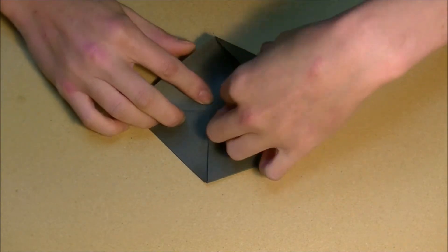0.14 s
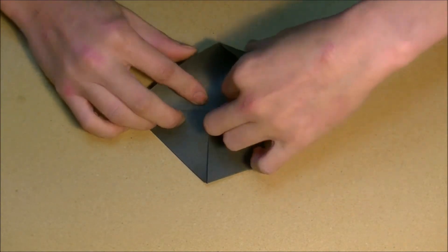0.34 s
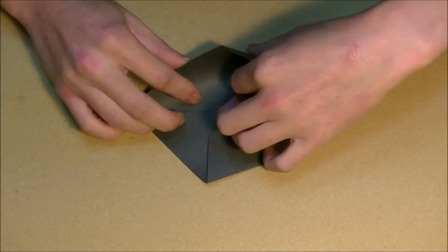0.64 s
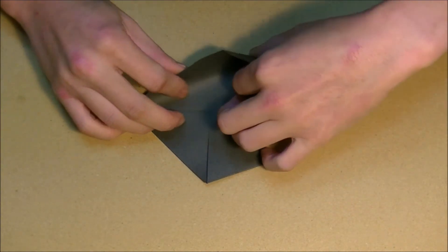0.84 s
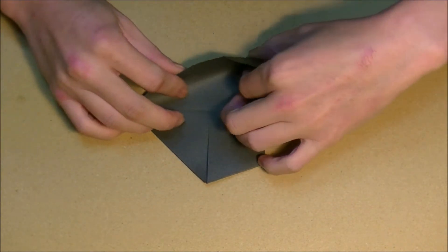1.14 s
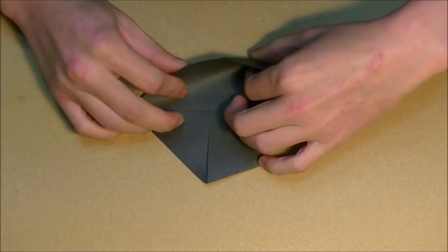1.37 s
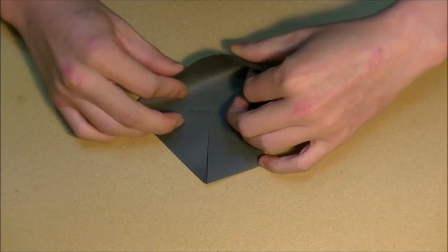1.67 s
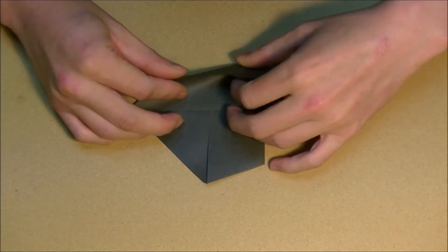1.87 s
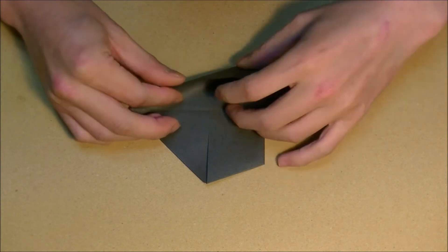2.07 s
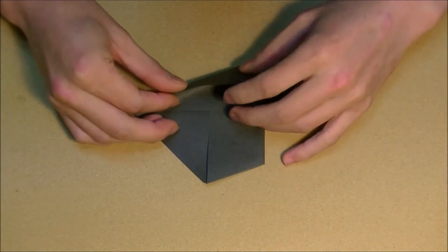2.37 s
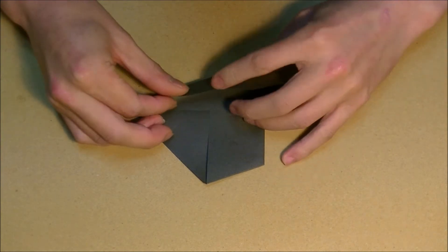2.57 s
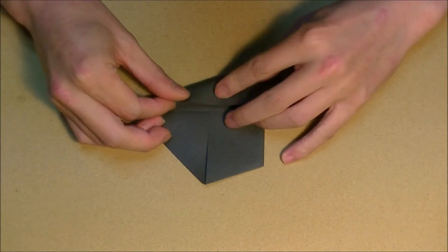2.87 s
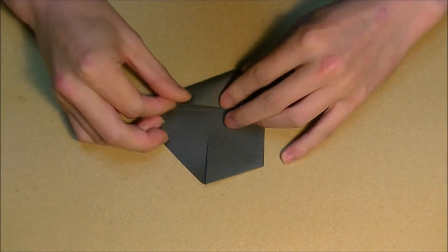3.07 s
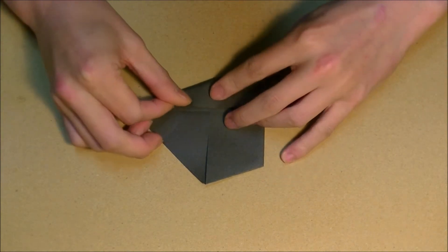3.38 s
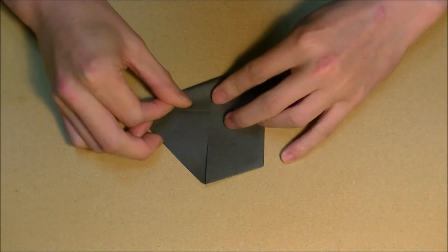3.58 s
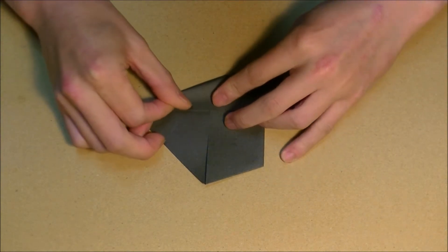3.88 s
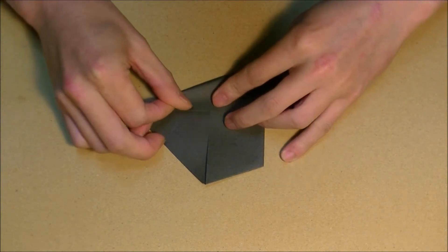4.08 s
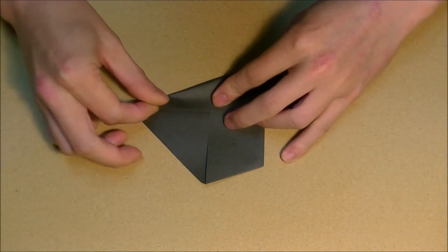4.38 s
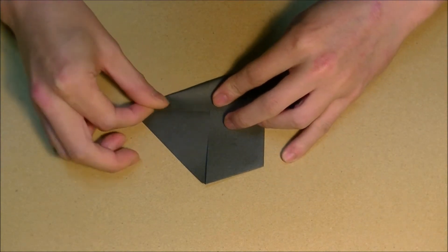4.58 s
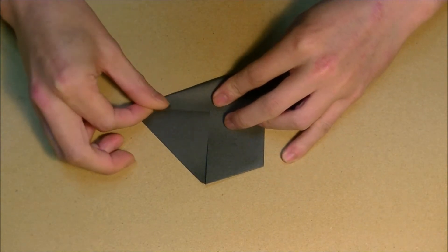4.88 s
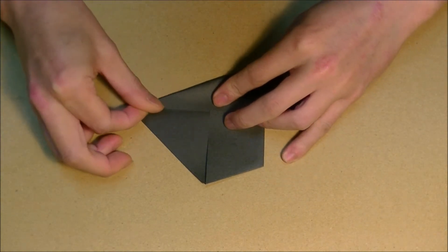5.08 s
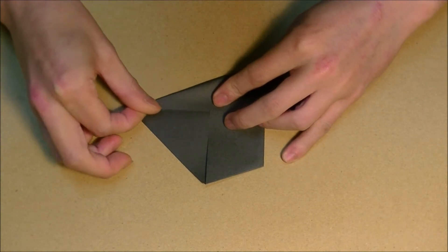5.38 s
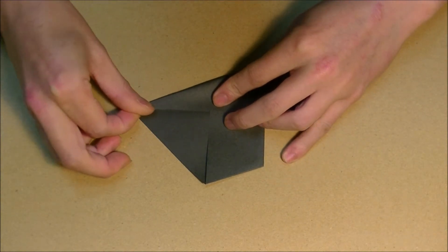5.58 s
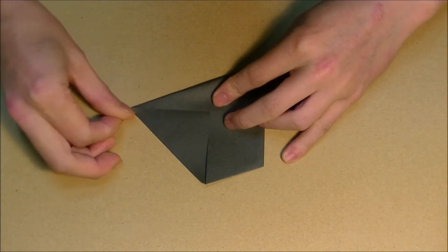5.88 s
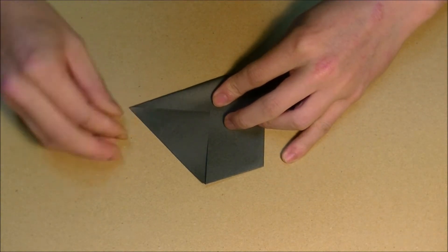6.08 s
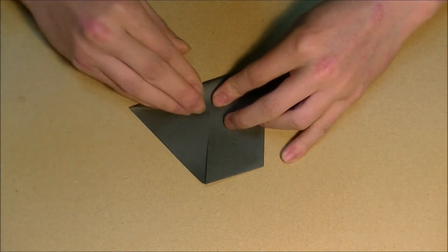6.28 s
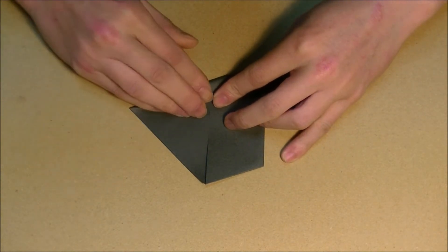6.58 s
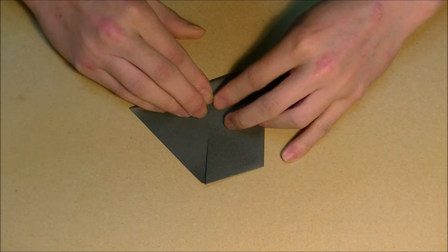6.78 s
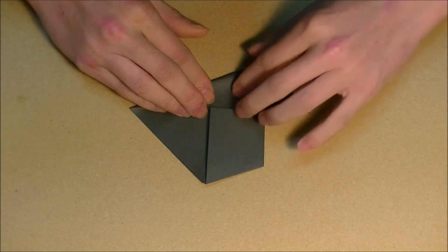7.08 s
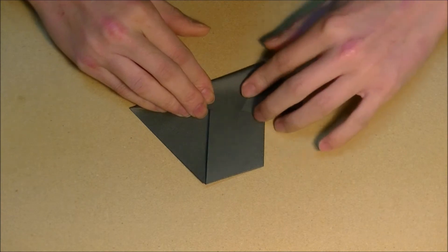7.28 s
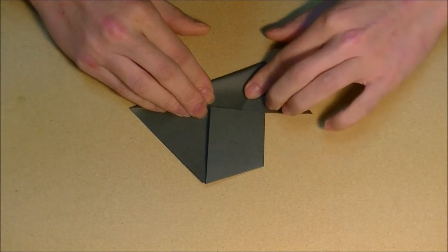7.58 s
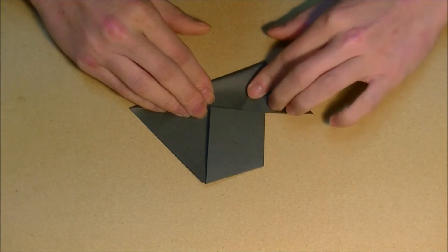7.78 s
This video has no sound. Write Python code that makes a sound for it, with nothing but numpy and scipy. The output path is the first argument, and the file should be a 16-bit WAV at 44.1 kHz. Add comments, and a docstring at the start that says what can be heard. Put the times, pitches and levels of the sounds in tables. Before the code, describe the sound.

Close, dry paper handling, with rustling rubs, quick flap flicks and sudden bright clicks as creased panels pop, over faint steady room noise.

```python
"""Folding stiff paper on a table

Two hands fold a small sheet of stiff paper in a quiet, small room.
Bent panels buckle with sharp snaps: lead-in noise, a one-sample jump and noise flutter, filtered as paper.
Flaps flick in fading noise bursts, finger pads land dully, and fingertips rub as dense ticks and crinkles
under a speed curve. Short chatter and a sinking pocket tone join the rubs.
A close stereo microphone hears this with bounces, a short room tail and steady coloured noise."""
import sys
import numpy as np
from scipy import signal
from scipy.fft import rfft, irfft, next_fast_len
from scipy.io import wavfile
from scipy.ndimage import uniform_filter1d

SR = 44100
rng = np.random.default_rng(int(sys.argv[2]) if len(sys.argv) > 2 else 0)


def wrap_up_sound(samples):
    """Save the sound to the file named by the first command line argument, as 16-bit audio."""
    columns = np.atleast_2d(samples).T
    # keep every value between -1 and 1, then stretch to whole-number steps
    tamed = np.clip(columns, -1, 1)
    steps = np.round(tamed * 32767).astype(np.int16)
    wavfile.write(sys.argv[1], SR, steps)


N = 350154
TIME = np.arange(N) / SR


def undb(db):
    """Decibels to gain."""
    return 10 ** (np.asarray(db) / 20)


def unit(x):
    """Scale to unit energy."""
    return x / np.sqrt(np.sum(x ** 2))


def steady(x):
    """Scale to standard deviation 1."""
    return x / np.std(x)


def curve(points, hz):
    """Read (Hz, dB) points on a logarithmic frequency axis."""
    point_hz, db = np.transpose(points)
    return np.interp(np.log(np.maximum(hz, 1)), np.log(point_hz), db)


def bins(size):
    """Frequencies in Hz of a real spectrum."""
    return np.arange(size // 2 + 1) * SR / size


def colour(x, points):
    """Zero-phase filter by a (Hz, dB) curve."""
    size = next_fast_len(len(x), real=True)
    gain = undb(curve(points, bins(size)))
    return irfft(rfft(x, size) * gain, size)[:len(x)]


def causal(gain):
    """Minimum-phase spectrum: the most sudden response that has this gain."""
    cepstrum = irfft(np.log(gain + 1e-9))
    half = len(cepstrum) // 2
    cepstrum[1:half] *= 2
    cepstrum[half + 1:] = 0
    return np.exp(rfft(cepstrum))


def even(x, span_hz):
    """Level out a noise burst's chance spectral peaks that are wider than span_hz."""
    spectrum = rfft(x)
    power = uniform_filter1d(abs(spectrum) ** 2, max(int(span_hz * len(x) / SR), 3))
    return irfft(spectrum * causal(np.sqrt(power.mean() / power)))


def walk(rate_hz):
    """Smoothed random curve with spread 1, about rate_hz new levels a second."""
    levels = rng.standard_normal(4096)
    line = np.interp(TIME * rate_hz, np.arange(len(levels)), levels)
    return steady(uniform_filter1d(line, int(SR / rate_hz / 2)))


def narrow(hz, width_hz):
    """A resonance at hz, kept ringing by irregular friction: two random curves on a quadrature carrier."""
    phase = 2 * np.pi * np.cumsum(hz * np.ones(N)) / SR
    return walk(width_hz) * np.cos(phase) + walk(width_hz) * np.sin(phase)


def add(track, start_s, sound):
    """Mix a sound in at start_s."""
    i = int(start_s * SR)
    track[i:i + len(sound)] += sound[:N - i]


def band_db(gain, hz, low_hz, high_hz):
    """Energy of a spectrum inside a band."""
    return 10 * np.log10(np.mean(gain ** 2 * ((hz > low_hz) & (hz < high_hz))))


def sheet(push, start_s, panel_hz, edge_db, panel_db, body_offset_db, panel_width=.1):
    """Paper's answer to a push: colour of the fold stage, one panel resonance, set body and edge levels."""
    # Colours of the loose sheet, the raised flap and the tight last fold. Each row: frequency in Hz, gain in dB.
    loose = [(100, -22), (170, -30), (290, -27), (400, -6), (490, -9), (620, -0.5), (740, 5), (880, -6),
             (1020, -1.5), (1400, -5), (1660, 2.5), (2150, -4), (2460, -1), (3200, -3.5), (3500, 4),
             (3950, -4), (5200, -4.5), (7000, -12), (10500, -14), (12500, -22), (15000, -29)]
    raised = [(60, -52), (150, -41), (450, -25.5), (670, 3), (950, -7), (1260, -3.5), (1500, -7.5),
              (1900, -6.5), (2250, -1.5), (2700, -4), (3300, 0), (3900, -4), (4300, -8), (5100, -12),
              (6200, -23.5), (8500, -17.5), (10500, -18), (15500, -40)]
    tight = [(60, -40), (130, -20), (330, -16), (900, -22), (1100, -15), (1300, -5.5), (1500, -11.5),
             (1750, -2), (1940, 3.5), (2250, -7), (2900, -4), (3400, -0.5), (4300, 0.5), (4900, -1),
             (5700, -19.5), (7800, -13), (11000, -17), (15500, -30)]
    raised_from_s, tight_from_s = 1.0, 6.7

    # the loose sheet moves more air than the raised flap, the tight fold less
    if start_s < raised_from_s:
        shape, stage_db = loose, 3
    elif start_s < tight_from_s:
        shape, stage_db = raised, 0
    else:
        shape, stage_db = tight, -2.5

    # smaller panels ring higher and sound brighter: 2 dB/octave of tilt per octave above a typical panel
    typical_panel_hz, tilt_db_per_octave = 2790, 2
    hz, spectrum = bins(len(push)), rfft(push)
    octaves = np.log2(np.clip(hz, 1000, 6000) / 1000)
    tilt_db = tilt_db_per_octave * np.log2(panel_hz / typical_panel_hz) * octaves
    resonance_db = panel_db / (1 + ((hz / panel_hz - 1) / panel_width) ** 2)
    gain = undb(curve(shape, hz) + tilt_db + resonance_db)

    # smaller panels move less of the flap: body falls 8.5 dB per octave of panel pitch
    body_db = -3 + stage_db + body_offset_db - 8.5 * np.log2(panel_hz / 1000)

    # body (whole flap) and edge (crease) are set against the middle band
    pushed = gain * abs(spectrum)
    body = band_db(pushed, hz, 400, 1000)
    middle = band_db(pushed, hz, 1000, 6000)
    edge = band_db(pushed, hz, 6000, 15000)
    balance = [(200, -middle), (580, body_db - body), (850, body_db - body),
               (1120, -middle), (5000, -middle), (6500, edge_db - edge)]
    return irfft(spectrum * causal(gain * undb(curve(balance, hz))))


def snaps(flutter_db=-6.0, flutter_per_db=-0.3, flutter_s=0.0021, flutter_rise_s=0.00046,
          lead_in_db=-21, lead_in_s=0.001, lead_s=.005, size=2048):
    """Faint noise swells for about 1 ms, the panel jumps in one step, bending waves flutter, more if weak."""
    # Bent panels snapping through.
    # Each row: jump time in seconds, level in dB, panel resonance in Hz, edge level in dB re middle band.
    snap_rows = [(1.193, -29.5, 2630, -16), (2.8529, 0, 2280, -17), (2.856, -15.5, 1300, -28),
                 (3.5753, -9, 3250, -16.5), (3.68, -26.5, 3210, -10), (4.1897, -27, 3250, -3.5),
                 (4.2352, -16, 3080, -9), (4.977, -40, 3400, -4), (5.344, -39, 2400, -5),
                 (5.532, -40.5, 3000, 0), (5.8712, -35.5, 1980, -2), (6.8229, -20.5, 2630, -11),
                 (6.9908, -10, 2600, -11.5), (7.4928, 2.5, 3700, -12), (7.8555, -37, 1340, -10)]
    out, jump = np.zeros(N), int(lead_s * SR)
    t = (np.arange(size) - jump) / SR
    after = np.maximum(t, 0)
    lead_in_shape = (t < 0) * np.exp(-abs(t) / lead_in_s)
    flutter_shape = np.exp(-after / flutter_s) * (1 - np.exp(-after / flutter_rise_s))
    for jump_s, db, panel_hz, edge_db in snap_rows:
        noise = rng.standard_normal(size)
        push = undb(lead_in_db) * unit(noise * lead_in_shape)
        push += undb(flutter_db + flutter_per_db * db) * unit(noise * flutter_shape)
        push[jump] += 1
        snap = sheet(push, jump_s, panel_hz, edge_db, panel_db=4, body_offset_db=-5)
        add(out, jump_s - lead_s, undb(db) * snap)
    return out


def flicks(contact_s=0.0047, contact_s_per_db=-.00005, rise_s=0.00045, scatter_db=3, size=4096):
    """An edge slips off in a quick, fading burst of unequal contacts; a gentle flick takes longer to settle."""
    # Flaps and fingertips flicking over edges.
    # Each row: start in seconds, level in dB, panel resonance in Hz, edge level in dB re middle band.
    flick_rows = [(0.0853, -23.5, 1530, -10), (0.1545, 2.5, 2450, -8), (0.3455, -24.5, 3400, -3),
                  (0.3505, -17, 1400, -9.5), (0.4345, -12.5, 1760, -6), (0.3825, -26, 4400, -9),
                  (0.461, -19.5, 3830, -6), (0.6241, -31, 2200, -8), (1.533, -32, 1900, -14),
                  (2.185, -25, 2900, -13), (2.289, -27.5, 2890, -10), (2.3105, -21.5, 3250, -9.5),
                  (2.3681, -25.5, 2890, -12), (2.3738, -26.5, 2890, -12), (2.4511, -27.5, 2000, -24),
                  (2.4817, -23, 2100, -13), (2.5154, -28, 1890, -15), (2.5504, -31.5, 2400, -17),
                  (2.8675, -16.5, 1300, -28), (3.181, -15.5, 690, -25), (3.438, -35, 2300, -24),
                  (3.4968, -19, 2400, -17), (3.504, -23.5, 2900, -15), (3.5948, -20, 1260, -29),
                  (3.612, -29, 1400, -28), (4.143, -38.5, 3800, 1.5), (4.1522, -27.5, 2000, -20),
                  (5.889, -36.5, 2600, 1), (6.2805, -27.5, 3230, -7.5), (6.293, -34, 1900, -5),
                  (6.955, -32.5, 3500, -6), (7.1336, -27, 2700, -19), (7.2029, -21.5, 3680, -2.5),
                  (7.2113, -17.5, 3340, -11), (7.6492, -28, 4290, 2), (7.6738, -29.5, 3570, -0.5)]
    out, t = np.zeros(N), np.arange(size) / SR
    for start_s, db, panel_hz, edge_db in flick_rows:
        contacts = rng.standard_normal(size) * undb(scatter_db * rng.standard_normal(size))
        settle_s = max(contact_s + contact_s_per_db * db, rise_s)
        envelope = np.exp(-(t / settle_s) ** 1.35) * (1 - np.exp(-t / rise_s))
        push = even(contacts * envelope, span_hz=600)
        flick = sheet(push, start_s, panel_hz, edge_db, panel_db=4, body_offset_db=-1)
        add(out, start_s, undb(db) * flick)
    return out


def pads(contact_s=.003, order=6, size=2048):
    """A soft finger pad lands on the paper with a dull, low-passed pat."""
    # Landings. Each row: start in seconds, level in dB, frequency in Hz above which the pat is muffled.
    pad_rows = [(3.0806, -23, 2700), (5.7262, -32.5, 1750), (5.896, -34, 1600)]
    # The flat sheet under a pad. Each row: frequency in Hz, gain in dB.
    flat_sheet = [(100, -32), (320, -7), (1300, -1.5), (1630, 5), (1900, -1.5)]
    out, t, hz = np.zeros(N), np.arange(size) / SR, bins(size)
    for start_s, db, muffle_hz in pad_rows:
        push = even(rng.standard_normal(size) * np.exp(-t / contact_s), span_hz=400)
        gain = undb(curve(flat_sheet, hz)) / np.hypot(1, (hz / muffle_hz) ** order)
        add(out, start_s, undb(db) * unit(irfft(rfft(push) * causal(gain))))
    return out


def stroke(t, start_s, length_s, rise_share, sharpness=0.84):
    """Speed of a finger that gathers pace and comes to rest again."""
    fastest_s = start_s + length_s * np.clip(rise_share, .05, .95)
    ramp = np.interp(t, [start_s, fastest_s, start_s + length_s], [0, 1, 0])
    return np.sin(np.pi / 2 * ramp) ** sharpness


def crinkles(low_hz=1000, high_hz=4900, ring_s=.0009, spread_db=2.2, count=6000, size=512):
    """Tiny wrinkles give way under the finger, each a short decaying sine with a pitch of its own."""
    out, t = np.zeros(N), np.arange(size) / SR
    for when, pitch, chance in rng.random((count, 3)):
        strength = undb(spread_db * min(-np.log(chance), 3))
        hz = low_hz + (high_hz - low_hz) * pitch
        add(out, when * TIME[-1], strength * np.exp(-t / ring_s) * np.sin(2 * np.pi * hz * t))
    return steady(out)


def fibres(catches_per_s=12000, spread_db=1.5, crinkle_db=-7):
    """Dense catches of skin on paper fibres, as random impulses, mixed with crinkles."""
    size = rng.choice([-1, 1], N) * undb(spread_db * np.minimum(rng.exponential(size=N), 4))
    catches = (rng.random(N) < catches_per_s / SR) * size
    return steady(steady(catches) + undb(crinkle_db) * crinkles())


def rubbed(drive, shape):
    """Fibre catches ring the held sheet: its body and the hiss above it, each at rms 1."""
    # Bending resonances where the sheet is held down. Each row: frequency in Hz, width in Hz, peak in dB.
    sheet_modes = [(1320, 90, 5.5), (1630, 150, 5), (2230, 110, 3), (2560, 120, 4), (2880, 100, 4),
                   (3230, 110, 4), (3870, 87, 1)]
    grid_hz = np.geomspace(50, SR / 2, 1024)
    ringing_db = sum(db / (1 + (2 * (grid_hz - hz) / width_hz) ** 2) for hz, width_hz, db in sheet_modes)
    sound = colour(drive, np.column_stack([grid_hz, curve(shape, grid_hz) + ringing_db]))
    body = colour(sound, [(5100, 0), (7000, -30)])
    return steady(body), steady(sound - body)


def panel(x, panel_hz, boost_db=4, width=.09):
    """The panel under the finger rings at its own pitch; rms 1."""
    hz = bins(1024)[1:]
    resonance_db = boost_db / (1 + ((hz / panel_hz - 1) / width) ** 2)
    return steady(colour(x, np.column_stack([hz, resonance_db])))


def rubs(level_db=-.6, hiss_offset_db=-0.17, judder_db=1.6, judder_hz=70,
         shift_db=2.5, shift_hz=14, shift_treble_db=-6, shift_hiss_db=-14):
    """Sliding fingertips judder and ring the slack, later taut sheet; resting fingers shift softly."""
    # Fingertip strokes. Each row: start in seconds, length in seconds, share of it spent gathering speed (0-1),
    # level in dB before level_db, hiss in dB re body before hiss_offset_db, panel resonance in Hz.
    rub_rows = [(0.025, 0.065, 0.54, -62.5, 2, 1580), (0.08, 0.072, 0.34, -53, -6.5, 1580),
                (0.161, 0.059, 0.2, -41.5, -15, 3500), (0.295, .06, .8, -63, 1, 3400),
                (0.35, 0.043, .6, -49, -8, 4400), (0.435, 0.061, 0.3, -46, -13, 3860),
                (0.635, .125, 0.4, -54, -5.5, 3250), (0.74, 0.12, .4, -60, -1.5, 3430),
                (0.999, 0.054, 0.2, -56, -8.5, 2650), (1.07, 0.12, 0.26, -63, -10, 1670),
                (1.191, 0.12, .5, -64.5, -13, 2170), (1.299, 0.077, .5, -59.5, -12, 1710),
                (1.447, .06, 0.23, -54, -8.5, 1910), (1.535, 0.061, 0.48, -54.5, -2, 3150),
                (1.58, 0.078, .5, -52, -4.5, 3150), (1.655, .11, 0.31, -47.5, -7.5, 3370),
                (1.8, 0.073, 0.34, -54.5, -11.5, 3270), (1.93, .11, .7, -54.5, -10.5, 1620),
                (2.031, .07, .5, -61.5, -13, 1300), (2.1, .1, .55, -52.5, -13, 1620),
                (2.165, 0.076, 0.4, -48, -11.5, 1590), (2.265, 0.063, 0.52, -50, -11, 2640),
                (2.585, .1, 0.48, -54.5, -11, 1630), (2.669, .05, .45, -59, -2.5, 2600),
                (2.9, 0.083, 0.3, -44, -12.5, 3150), (2.95, 0.088, .35, -49.5, -11, 3050),
                (3.099, 0.08, .25, -51, -3.5, 3250), (3.17, 0.052, 0.36, -60.5, -1.5, 3270),
                (4.225, 0.12, 0.47, -53.5, -4, 3110), (4.275, 0.094, 0.45, -54.5, -2.5, 4020),
                (4.465, .06, .1, -64.5, 2, 3890), (4.985, .085, .65, -64, -7, 3180),
                (5.339, .11, .5, -68, -8, 3300), (5.729, 0.16, 0.67, -65.5, -5, 1620),
                (6.38, 0.063, .45, -64.5, -0.5, 2650), (6.486, .06, 0.67, -62, -2, 3220),
                (6.773, 0.042, .3, -59, 0.5, 3310), (6.809, .17, 0.37, -56.5, -6.5, 3230),
                (6.992, .03, .3, -53, 0, 3700), (7.02, .07, 0.45, -56.5, -5.5, 3260),
                (7.156, 0.12, 0.48, -55, -8.5, 3500), (7.28, 0.14, .45, -56, -10, 3280)]
    # Rubbing colours on slack paper and on a taut fold. Each row: frequency in Hz, gain in dB.
    slack_colour = [(80, -48), (250, -19), (700, -9), (1100, -8), (1500, -4), (1950, -2), (2500, -4),
                    (3600, -4), (4600, -8), (5800, -14), (7500, -14.5), (9800, -10), (12500, -20.5),
                    (15500, -30)]
    taut_colour = [(80, -48), (250, -22), (900, -6.5), (1500, -8.5), (2200, -5.5), (3300, -3), (4700, -3),
                   (5500, -4), (6600, -13), (9500, -7.5), (12500, -16), (15500, -27)]
    # Resting fingers shifting on the slack sheet. Each row: time in seconds, level in dB.
    shift_rows = [(0, -62), (.28, -68.5), (.53, -61.5), (.9, -76), (1.15, -66), (1.4, -72), (2.6, -66.5),
                  (2.8, -74)]
    taut_from_s = 2.85

    out, drive = np.zeros(N), fibres() * undb(judder_db * walk(judder_hz))
    slack, taut = rubbed(drive, slack_colour), rubbed(drive, taut_colour)
    for start_s, length_s, rise_share, db, hiss_db, panel_hz in rub_rows:
        span = slice(max(int(start_s * SR), 0), int((start_s + length_s) * SR))
        speed = stroke(TIME[span], start_s, length_s, rise_share)
        # every stroke meets its own random patch of fibres
        first = rng.integers(N - SR)
        patch = slice(first, first + len(speed))
        body, hiss = slack if start_s < taut_from_s else taut
        friction = panel(body[patch], panel_hz) + undb(hiss_db + hiss_offset_db) * hiss[patch]
        out[span] += undb(db + level_db) * speed * friction

    shift_s, db = np.transpose(shift_rows)
    shifting = np.interp(TIME, shift_s, undb(db), right=0) * undb(shift_db * walk(shift_hz))
    slack_body, slack_hiss = slack
    soft = colour(slack_body, [(1800, 0), (4500, shift_treble_db)])
    return out + shifting * (soft + undb(shift_hiss_db) * slack_hiss)


def chatters(width_hz=720, rise_share=0.54):
    """Short runs of stick and slip on the taut fold, each ringing one narrow resonance."""
    # Each row: start in seconds, length in seconds, level in dB, pitch in Hz.
    chatter_rows = [(2.911, 0.028, -43.5, 3130), (2.963, .02, -47.5, 3060), (2.988, .024, -48.5, 3040)]
    out = np.zeros(N)
    for start_s, length_s, db, hz in chatter_rows:
        out += undb(db) * stroke(TIME, start_s, length_s, rise_share) * narrow(hz, width_hz)
    return out


def pocket(start_s=2.903, length_s=.13, shut_hz=900, open_hz=650, opening_s=0.0249,
           level_db=-47, attack_s=0.025, fade_db_per_s=-160, width_hz=190):
    """Rubbing rings the air under the lifting flap, whose pitch sinks as it opens."""
    age_s = np.maximum(TIME - start_s, 0)
    attack = np.minimum(age_s / attack_s, 1)
    fade = undb(level_db + fade_db_per_s * np.maximum(age_s - attack_s, 0))
    hz = open_hz + (shut_hz - open_hz) * np.exp(-age_s / opening_s)
    return attack * fade * (age_s < length_s) * narrow(hz, width_hz)


def stereo(mid, side, left_db):
    """Left and right from mid and side, with left raised by left_db over right."""
    return np.array([mid + side, mid - side]) * undb(np.array([[left_db], [-left_db]]) / 2)


def room(x, send, bounce_s=.0033, bounce_db=-13, wall_s=.0126, wall_db=-20, wet_db=-8.0,
         t60_s=0.26, treble_t60_s=0.21, treble_db=-1, gap_s=0.0052, size=16384):
    """Direct sound, bounces off a near surface and a wall, and a diffuse tail that loses treble first."""
    # Side gain for the direct wave's slope across the capsules, and for the tail.
    # Each row: frequency in Hz, gain in dB.
    direct_side = [(700, 5), (2200, -14), (4400, -12), (8000, -11.5), (15000, -9)]
    room_side = [(100, 5), (400, -5), (700, -10), (1300, -12), (4400, -8), (8000, -2.5), (15000, -4)]
    # Wall colour of the mid tail. Each row: frequency in Hz, gain in dB.
    room_colour = [(300, 0), (600, 2), (1400, 3.5), (2500, -.5), (5000, 0.5), (9000, -2.5), (15000, -4)]
    t = np.arange(size) / SR
    tails = []
    for noise in rng.standard_normal((2, size)):
        low = colour(noise, [(4000, -1), (9000, -20)])
        treble = undb(treble_db) * (noise - low)
        fading = low * undb(-60 * t / t60_s) + treble * undb(-60 * t / treble_t60_s)
        onset = np.clip(t / gap_s - .5, 0, 1)
        tails.append(undb(wet_db) * unit(even(fading * onset, span_hz=111)))
    mid_tail, side_tail = tails
    mid = x + signal.fftconvolve(send, colour(mid_tail, room_colour))[:N]
    add(mid, bounce_s, undb(bounce_db) * x)
    add(mid, wall_s, undb(wall_db) * x)
    # the two capsules differ slightly in phase
    side = signal.fftconvolve(send, colour(side_tail, room_side))[:N] + colour(np.gradient(x), direct_side)
    return stereo(mid, side, left_db=.7)


def background(air_db=-64, level_db=0.55, waver_db=.3, waver_hz=3.98, flicker_db=0.57, flicker_hz=18):
    """Steady coloured noise; mid and side flicker separately, the whole wavers slightly."""
    # Noise colour. Each row: frequency in Hz, relative density in dB per Hz.
    air = [(30, -23), (110, -23.5), (190, -19.5), (260, -7.5), (340, -1), (480, -3.5), (720, 0),
           (900, -4.5), (1200, -7), (2400, -12.5), (5000, -17), (10000, -20), (14500, -26), (16000, -34)]
    # Stereo width. Each row: frequency in Hz, side minus mid in dB.
    air_side = [(60, 8.5), (110, 8.5), (200, 0), (380, -2.5), (700, -2), (1300, 0), (15000, -1.5)]
    mid, side = (steady(colour(noise, air)) * undb(air_db + flicker_db * walk(flicker_hz))
                 for noise in rng.standard_normal((2, N)))
    waver = undb(level_db + waver_db * walk(waver_hz))
    return stereo(mid, colour(side, air_side), left_db=0.6) * waver


def scene(snap_room_db=-2.5, rub_room_db=-2):
    """Paper in the room; snaps face the microphone and hands cover the rubs, so less reaches the walls."""
    buckling = snaps()
    flicking = flicks() + pads()
    rubbing = rubs() + chatters() + pocket()
    send = undb(snap_room_db) * buckling + flicking + undb(rub_room_db) * rubbing
    return room(buckling + flicking + rubbing, send) + background()


def record(dry, top_hz=15900):
    """The recorder cuts the top with a steep elliptic low-pass."""
    return signal.sosfilt(signal.ellip(8, .2, 70, top_hz, fs=SR, output="sos"), dry)


dry = scene()
out = record(dry)
wrap_up_sound(out)
```